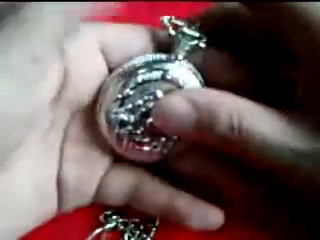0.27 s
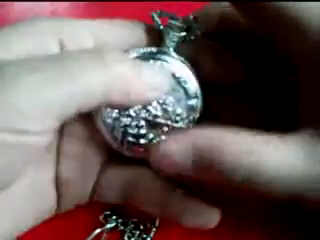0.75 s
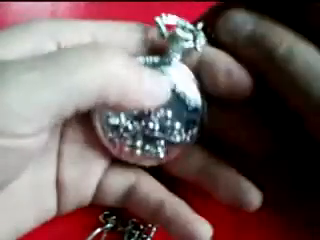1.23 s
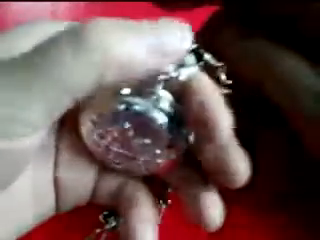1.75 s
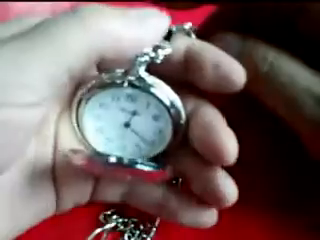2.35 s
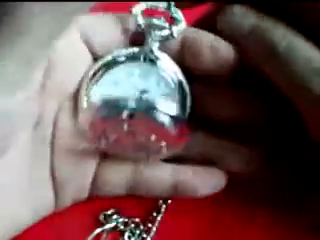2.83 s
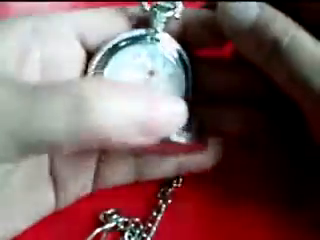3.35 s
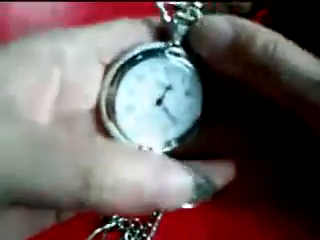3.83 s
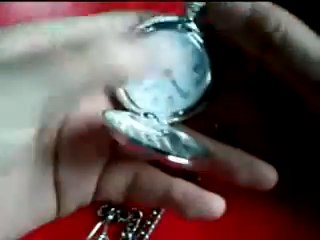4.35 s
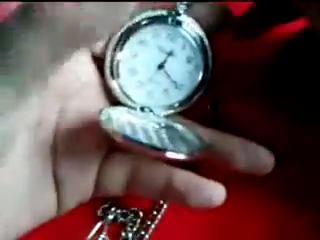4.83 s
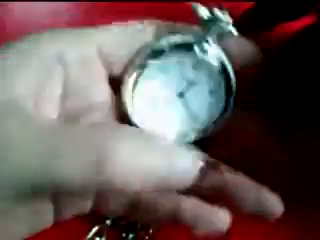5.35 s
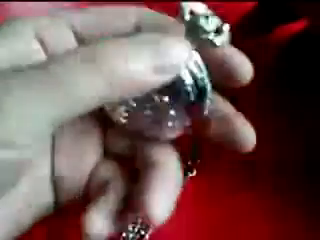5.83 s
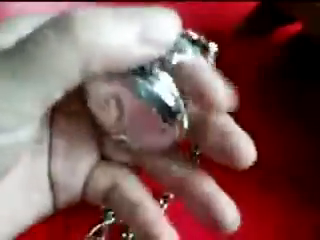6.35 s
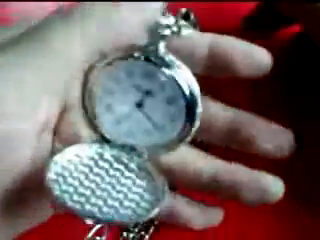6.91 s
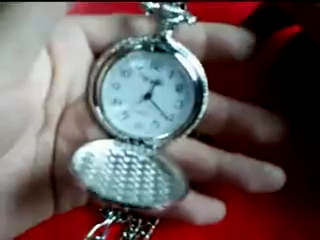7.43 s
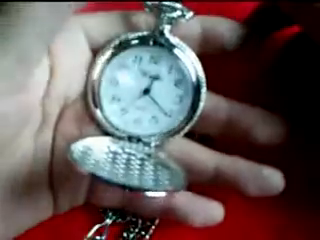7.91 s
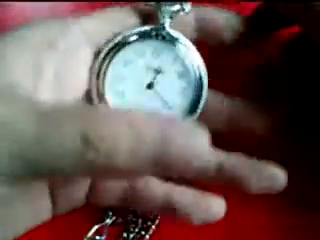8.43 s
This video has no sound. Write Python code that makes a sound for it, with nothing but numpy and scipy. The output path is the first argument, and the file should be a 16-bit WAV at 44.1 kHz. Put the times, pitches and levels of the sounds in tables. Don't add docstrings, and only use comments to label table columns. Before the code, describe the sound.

Close metallic clicks, faint finger rubbing and small chain rattles, with two sharp distorted lid snaps ringing into a bare room over soft hiss.

```python
import sys
import numpy as np
from scipy import signal
from scipy.fft import rfft, irfft
from scipy.io import wavfile

SR = 44100
rng = np.random.default_rng(int(sys.argv[2]) if len(sys.argv) > 2 else 0)


def output_pcm(signal):
    pcm = np.clip(np.atleast_2d(signal).T, -1, 1) * 32767
    wavfile.write(sys.argv[1], SR, np.round(pcm).astype(np.int16))


def gain_from_db(level_db):
    decades = np.asarray(level_db, float) / 20
    return 10 ** decades


N = 382347


def rms_one(x):
    return x / np.sqrt(np.mean(x ** 2) + 1e-20)


def at_hz(points, hz, axis=1):
    points = np.array(points)
    return np.interp(np.log(hz + 1), np.log(points[:, 0]), points[:, axis])


def coloured(spectrum):
    gain = gain_from_db(at_hz(spectrum, np.linspace(0, SR / 2, N // 2 + 1)))
    return rms_one(irfft(rfft(rng.standard_normal(N)) * gain, N))


def ring(clicks, modes):
    out = 0
    for k, (hz, width_hz, db) in enumerate(modes):
        radius = np.exp(-np.pi * width_hz / SR)
        angle = 2 * np.pi * hz / SR
        poles = [1, -2 * radius * np.cos(angle), radius * radius]
        mode = signal.lfilter([0, np.sin(angle)], poles, clicks + 1e-18)
        out = out + (-1) ** k * gain_from_db(db) * mode
    return out


def add(out, start_s, level_db, sound):
    i = int(start_s * SR)
    out[i:i + len(sound)] += (gain_from_db(level_db) * sound / np.abs(sound).max())[:N - i]


# corner_hz, density_db (per Hz)
RUMBLE_SPECTRUM = [(12, -52), (20, -4.5), (59, -12), (97, -1), (117, -10), (147, -5.5), (216, -3),
                   (287, -3.5), (328, -3), (520, -12), (700, -8.5), (910, -44.5), (1540, -120)]
# corner_hz, density_db (per Hz)
HISS_SPECTRUM = [(350, -29), (600, -16), (685, -8.5), (811, -2), (1410, -8), (1540, -13.5), (1930, -13.5),
                 (2210, -21), (2680, -18.5), (3530, -28), (7200, -31.5), (10700, -51), (13900, -86),
                 (22000, -120)]
# centre_hz, width_hz, level_db
ROOM_HUMS = [(57.1, 9.2, -57.5), (88.92, 4.2, -54), (139.8, 6.7, -60), (296, 60, -55.5), (2680, 90, -68)]


def background():
    white = rng.standard_normal(N)
    hums = 0
    for hz, width_hz, level_db in ROOM_HUMS:
        resonance = [(hz, width_hz, 0)]
        hums = hums + gain_from_db(level_db) * rms_one(ring(ring(white, resonance), resonance))
    return gain_from_db(-47.5) * coloured(RUMBLE_SPECTRUM) + gain_from_db(-49.5) * coloured(HISS_SPECTRUM) + hums


# band_hz, t60_s
ROOM_DECAY = [(250, .8), (600, 1.1), (1100, 1.68), (2000, 1.44), (3700, 1.33), (5500, 1.14), (9000, 1.1)]


def room(x):
    level_db, onset_s = -7.5, 0.016
    t = np.arange(int(1.5 * SR)) / SR
    white = rng.standard_normal((2, len(t)))
    edges = 180 * 2 ** np.arange(0, 6.1, 1 / 3)
    tail = 0
    for k, (low, high) in enumerate(zip(edges, edges[1:])):
        bandpass = signal.butter(2, [low, high], "band", fs=SR, output="sos")
        band = signal.sosfilt(bandpass, white[k % 2])
        tail = tail + band * gain_from_db(-60 * t / at_hz(ROOM_DECAY, low * 1.3))
    tail = tail * (1 - np.exp(-(t / onset_s) ** 2)) / np.sqrt(SR / 20)
    return gain_from_db(level_db) * signal.fftconvolve(x, tail)[:N]


# delay_ms, level_db
NEAR_ECHOES = [(7.5, -31.5), (12.1, -34), (14.4, -31.5), (16.3, -34), (20.5, -41), (27, -41)]


def early(x):
    return sum(gain_from_db(level_db) * np.roll(x, int(delay_ms * SR / 1000)) for delay_ms, level_db in NEAR_ECHOES)


def blurred(modes):
    spread = 2.3
    return [(hz, width_hz * spread, db + 10 * np.log10(spread)) for hz, width_hz, db in modes]


def grains(per_s, spread_db, size):
    strength = gain_from_db(spread_db * np.minimum(rng.exponential(1, size), 3)) * rng.choice([-1, 1], size)
    return (rng.random(size) < per_s / SR) * strength


def struck(modes, hz, fall_db, draw=0):
    draw = np.zeros(len(modes)) + draw
    return [(mode_hz, width_hz, db - fall_db * abs(np.log2(mode_hz / hz)) - 7 * chance)
            for (mode_hz, width_hz, db), chance in zip(modes, draw)]


# mode_hz, width_hz, level_db
SHELL_MODES = [(1504, 140, 6.5), (1980, 130, 5), (2380, 286, 9), (2623, 240, 8.5), (3220, 250, 4.5)]
# mode_hz, width_hz, level_db
LINK_MODES = [(3800, 354, -3.5), (4400, 126, -8), (4820, 200, -6), (5700, 280, -0.5), (6250, 400, -1.5),
              (7050, 510, 0), (8060, 520, -4.5), (8860, 1400, -3)]
# start_s, pressure_db
FINGER_PRESSURE = [(0.0, -60), (0.9, -61), (1.5, -51.5), (1.64, -67), (2.11, -62.5), (3.35, -59),
                   (3.6, -64), (3.92, -55), (4.2, -51.5), (4.52, -57), (4.61, -40.5), (4.9, -52),
                   (5.25, -68), (5.49, -50.5), (6.2, -48), (6.4, -54.5), (7.4, -62), (8.67, -63)]


def rubbing(per_s=4000, spread_db=5.5):
    slips = grains(per_s, spread_db, size=N)
    pressure_db = np.interp(np.arange(N) / SR, *np.transpose(FINGER_PRESSURE))
    shell = ring(slips, struck(SHELL_MODES, 2660, 8.1))
    link_db = -71 + .25 * (pressure_db + 55)
    return gain_from_db(pressure_db - 4.5) * rms_one(shell) + gain_from_db(link_db) * rms_one(ring(slips, LINK_MODES))


# mode_hz, width_hz, level_db
LID_CAVITY = [(1018, 218, 0)]
# start_s, length_ms, level_db, shell_pitch_hz
HINGE_SCRAPES = [(1.60, 86, -51.5, 2380), (1.968, 25, -42, 2270), (2.0, 35, -41, 2400),
                 (2.029, 83, -46, 2500), (2.225, 20, -44, 2500), (3.36, 70, -53, 2600),
                 (4.16, 17, -45.5, 2400), (4.281, 33, -33, 2360), (4.311, 67, -40, 2450),
                 (4.358, 15, -34.5, 2350), (4.582, 27, -37.5, 2100), (4.675, 26, -35.5, 2086),
                 (5.122, 117, -50, 2450), (5.654, 40, -42.5, 2190), (5.685, 60, -42.5, 2160),
                 (5.768, 5.9, -46.5, 2494), (6.092, 38, -39, 2110), (6.32, 30, -43, 2280),
                 (6.343, 41, -36, 2430), (6.861, 84, -53, 2450), (8.301, 330, -60.5, 2510),
                 (6.738, 22, -42, 2400)]
# start_s, length_ms, level_db (of the links)
CHAIN_SLIDES = [
    (3.783, 15, -52),
    (4.055, 21, -46.5),
    (4.16, 17, -55),
    (4.582, 28, -46),
    (6.719, 31, -52),
    (6.9, 5.9, -42),
]


def scrapes(per_s=2500, spread_db=6.5):
    out, t = np.zeros(N), np.arange(12000) / SR
    slide_shell_db, slide_shell_hz = -3.5, 2400
    rows = [(*row, -16) for row in HINGE_SCRAPES]
    rows += [(s, ms, db + slide_shell_db, slide_shell_hz, -slide_shell_db) for s, ms, db in CHAIN_SLIDES]
    for start_s, length_ms, level_db, hz, link_db in rows:
        slips = grains(per_s, spread_db, size=len(t))
        shell = rms_one(ring(slips, struck(SHELL_MODES, hz, 11.7)))
        links = gain_from_db(link_db) * rms_one(ring(slips, LINK_MODES))
        cavity = gain_from_db(-15.5) * rms_one(ring(slips, LID_CAVITY))
        part = t / (length_ms / 1000)
        envelope = np.minimum(part / 0.084, 1) * np.exp(-part ** 3) * gain_from_db(-3 * part)
        i = int(start_s * SR)
        out[i:i + len(t)] += gain_from_db(level_db) * (shell + links + cavity) * envelope
    return out


def contact(draw, ms, hz, size=2048):
    clicks = np.zeros(size)
    after = np.sort(draw[0, :4]) * ms / 1000
    halves = np.round((after - after[0]) * 2 * hz)
    strength = gain_from_db(-6 * draw[2, :4] - 2.1 * np.arange(4))
    np.add.at(clicks, np.round(halves * SR / (2 * hz)).astype(int), (-1) ** halves * strength)
    return clicks


# start_s, level_db, pitch_hz
FIRM_TICKS = [(1.9682, -26.5, 2230), (1.9992, -30, 2400), (2.03, -28.5, 2440), (2.2339, -20.5, 2660),
              (3.727, -30.5, 1650), (4.011, -22.5, 2220), (4.2771, -21, 2380), (4.2818, -22, 2450),
              (4.2948, -30, 2300), (4.352, -28.5, 2620), (4.3658, -21.5, 2150), (4.3701, -28, 2420),
              (4.5572, -24.5, 2300), (4.5772, -18, 2950), (4.579, -17, 2050), (4.59, -26, 2060),
              (4.6814, -26, 1980), (4.802, -30, 2020), (5.308, -31.5, 2100), (5.433, -28.5, 2030),
              (5.668, -32, 1980), (5.691, -28.5, 2580), (5.7069, -25.5, 1960), (5.728, -23, 2080),
              (6.0933, -19.5, 2150), (6.114, -24, 2130), (6.3432, -27, 2360), (6.738, -26, 2380),
              (6.8009, -33.5, 1990), (6.8996, -33, 2680)]
# start_s, level_db
LIGHT_TOUCHES = [(0.3432, -36.5), (1.5447, -36), (1.914, -41), (2.037, -33), (2.0547, -37), (2.266, -38),
                 (2.3067, -42), (2.8589, -42), (2.919, -45), (3.0494, -42), (3.3998, -43), (3.7904, -41),
                 (4.1668, -36), (4.431, -32.5), (4.4917, -35.5), (4.9, -40), (5.0972, -39.5), (5.171, -41),
                 (5.576, -41), (5.6557, -31), (6.324, -41), (6.6353, -40), (6.8728, -41), (7.0095, -32.5),
                 (7.192, -40), (7.2036, -32.5), (7.267, -39.5), (8.2975, -39.5), (8.426, -35.5),
                 (8.5907, -39.5)]
# start_s, level_db, pitch_hz
LINK_PINGS = [(0.0368, -41.5, 3800), (3.7268, -21, 3800), (3.727, -32, 7200), (3.8626, -39.5, 3880),
              (3.9663, -36, 4900), (3.9764, -41, 3930), (4.0634, -46, 5610), (4.0686, -41, 5680),
              (4.1666, -39, 5150), (4.2238, -44, 4030), (4.2779, -33, 4120), (4.2948, -32, 3840),
              (4.3654, -33, 3600), (4.579, -25.5, 4720), (4.6094, -31.5, 3630), (4.6814, -34.5, 4650),
              (5.0968, -46, 5680), (5.6915, -38, 5490), (5.7069, -37, 5870), (6.0935, -28, 5250),
              (6.6953, -44, 3820), (6.72, -37, 3810), (6.738, -41, 3670), (6.9, -28, 3940),
              (6.902, -24, 7050), (6.9105, -49, 4400), (6.9165, -45, 5700), (7.089, -46, 4930),
              (7.3098, -45.5, 5170), (8.4694, -52.5, 3750)]
# start_s, level_db
LID_KNOCKS = [(0.3434, -35), (2.2344, -27.5), (2.266, -37), (4.2768, -32), (4.282, -36), (4.3666, -37),
              (4.5765, -26), (4.6814, -36), (5.7069, -33.5), (5.7279, -35.5), (6.6613, -22.5),
              (6.6957, -25), (6.721, -32), (6.7548, -31), (6.7642, -29.5), (6.8009, -42), (6.7683, -32.5)]


def strikes():
    # shell_db, cavity_db, link_db
    tick_mix, touch_mix = (0, -17, -18), (0, -12, -12.5)
    ping_mix, knock_mix = (-10.5, -24, 0), (-14, 0, -22)
    rows = [(s, db, tick_mix, hz, 0) for s, db, hz in FIRM_TICKS]
    rows += [(s, db, touch_mix, 0, 0) for s, db in LIGHT_TOUCHES]
    rows += [(s, db, ping_mix, 0, hz) for s, db, hz in LINK_PINGS]
    rows += [(s, db, knock_mix, 0, 0) for s, db in LID_KNOCKS]
    return rows


def ticks():
    direct, send = np.zeros(N), np.zeros(N)
    crack = [(2600, 2700, 0)]
    rows = strikes()
    for (s, db, mix, hz, link_hz), draw in zip(rows, rng.random((len(rows), 6, 8))):
        shell_db, cavity_db, link_db = mix
        hz = hz or np.interp(draw[5, 1], [0, 1], (1944, 2700))
        link_hz = link_hz or np.interp(draw[5, 2] ** 2, [0, 1], (3600, 5700))
        shell = struck(SHELL_MODES, hz, 14, draw[3, :5])
        links = struck(LINK_MODES, link_hz, 14, draw[4])
        for modes, rel_db, pitch_hz in [(shell, shell_db, hz), (links, link_db, link_hz)]:
            add(direct, s, db + rel_db, ring(contact(draw, 1.6, pitch_hz), modes))
            add(send, s, db + rel_db, ring(contact(draw, 0, pitch_hz), blurred(modes)))
        add(direct, s, db + shell_db - 11, ring(contact(draw, 0.7, crack[0][0]), crack))
        cavity = [(f * (0.95 + 0.14 * draw[5, 0]), width_hz, g) for f, width_hz, g in LID_CAVITY]
        knock = ring(ring(contact(draw, 0, hz), cavity), cavity)
        add(direct, s - .0006, db + cavity_db, knock)
        add(send, s, db + cavity_db + 0.5, knock)
    return direct, send


def wash(spectrum, size=2048):
    gain = gain_from_db(at_hz(spectrum, np.linspace(0, SR / 2, size // 2 + 1)))
    click = np.roll(irfft(gain), size // 2)
    return click / click.max()


# start_s, blow_db, sign (push +1, pull -1)
SNAP_IMPACTS = [
    [(1.0068, -25, 1), (1.0077, -11, -1), (1.0089, 6, 1), (1.0098, 1.5, 1), (1.0108, -1.5, 1),
     (1.0117, -35, 1)],
    [(5.7862, -26.5, 1), (5.7872, -5.5, -1), (5.7881, 9.5, 1), (5.7890, -20, 1), (5.7899, 3.5, 1),
     (5.7908, -9.5, 1)],
]
# mode_hz, width_hz, level_db
SNAP_CASE_MODES = [
    [(1070, 490, -1), (1630, 160, 1.5), (2530, 310, 1), (3720, 550, -7), (4530, 220, -38), (4830, 100, -21),
     (5400, 180, -27), (5940, 530, -19), (6140, 130, -13), (7600, 150, -24.5)],
    [(1035, 175, -8), (1550, 210, -7), (2030, 60, -40), (2630, 440, -2.5), (4300, 180, -2),
     (5760, 1700, -16), (5785, 260, -7.5), (7090, 240, -20.5), (7580, 300, -36.5), (9800, 330, -37.5)],
]
# mode_hz, width_hz, level_db
SNAP_RIM_MODES = [
    [(910, 230, -8), (2050, 490, -17)],
    [(890, 190, -19.5), (3870, 390, -7)],
]
# direct_db, room_send_db
SNAP_LEVELS = [(-3, -10), (-4.5, -9)]
# (extra, per s per 100 Hz of pitch)
THUMB_DAMPING = [(0.92, 250), (0.53, 249.5)]
# corner_hz, density_db (per Hz)
SNAP_ROOM_COLOUR = [
    [(260, -46), (450, -30), (541, -28), (570, -18), (1230, -3), (2130, -15.5), (3210, -16.5),
     (3860, -25.5), (5020, -18), (7260, -30.5), (8850, -35.5), (10500, -54), (13600, -88), (22000, -120)],
    [(260, -55), (450, -24), (500, -18), (601, -37.5), (714, -12), (1150, -3), (1400, -9.5), (1820, -13.5),
     (2500, -14), (3080, -19), (5800, -15.5), (10500, -43), (13600, -79.5), (22000, -120)],
]


def snaps():
    direct, send, t = np.zeros(N), np.zeros(N), np.arange(2048) / SR
    for k, draw in enumerate(rng.normal(0, 1, (2, 10, 6))):
        s, blow_db, sign = np.transpose(SNAP_IMPACTS[k])
        direct_db, send_db = SNAP_LEVELS[k]
        delay_ms, damping_db = THUMB_DAMPING[k]
        held_s = np.maximum(t - (s[-1] - s[0]) - delay_ms / 1000, 0)
        i = int(s[0] * SR)
        for m, mode in enumerate(SNAP_CASE_MODES[k] + SNAP_RIM_MODES[k]):
            share = np.cos(draw[m % 10] * min(mode[0] / 2500, 1.6))
            clicks = np.zeros(2048)
            clicks[((s - s[0]) * SR).astype(int)] = (-1) ** m * np.sign(sign) * gain_from_db(blow_db) * share
            thumb_db = damping_db * held_s * max(mode[0] - 700, 0) / 100
            direct[i:i + 2048] += gain_from_db(direct_db - thumb_db) * ring(clicks, [mode])
        add(send, s[2] - 1024 / SR, send_db + 12, wash(SNAP_ROOM_COLOUR[k]))
    return direct, send


def scene():
    snap, snap_send = snaps()
    tick, tick_send = ticks()
    scrape = scrapes()
    send = snap_send + gain_from_db(-6.5) * tick_send + gain_from_db(-5.5) * scrape
    watch = snap + tick + scrape + rubbing()
    mix = watch + early(snap + gain_from_db(3.5) * tick) + room(send) + background()
    return mix[None]


def limit(x, top, hardness):
    return x / (1 + np.abs(x / top) ** hardness) ** (1 / hardness)


def band_limit(x):
    return signal.sosfilt(signal.butter(12, 15800, fs=SR, output="sos"), x)


def record(dry):
    clipped = limit(dry, .57, 5.7)
    cut = signal.sosfilt(signal.cheby2(12, 60, 11050, fs=SR, output="sos"), clipped)
    cut = signal.sosfilt(signal.butter(2, 8700, fs=SR, output="sos"), cut)
    whine_hz, whine_db = SR / 4, -96
    whine = gain_from_db(whine_db) * np.sqrt(2) * np.sin(2 * np.pi * whine_hz * np.arange(N) / SR + .5)
    return band_limit(limit(cut, .735, 60) + whine)


dry = scene()
out = record(dry)
output_pcm(out)
```